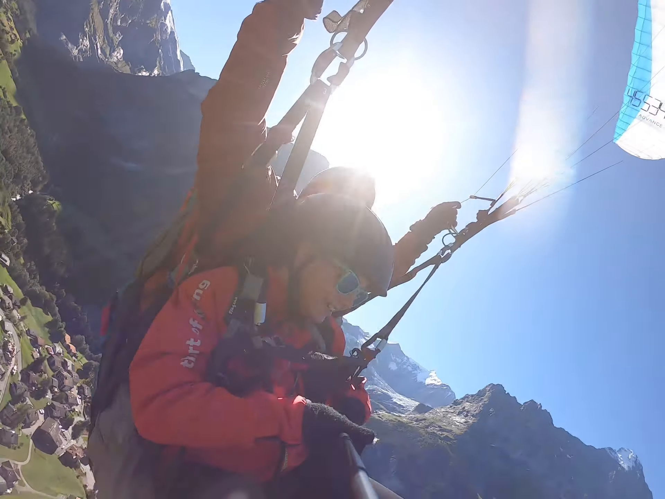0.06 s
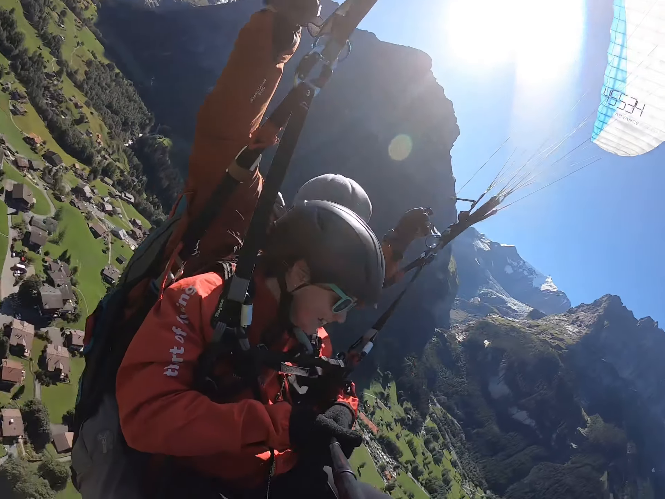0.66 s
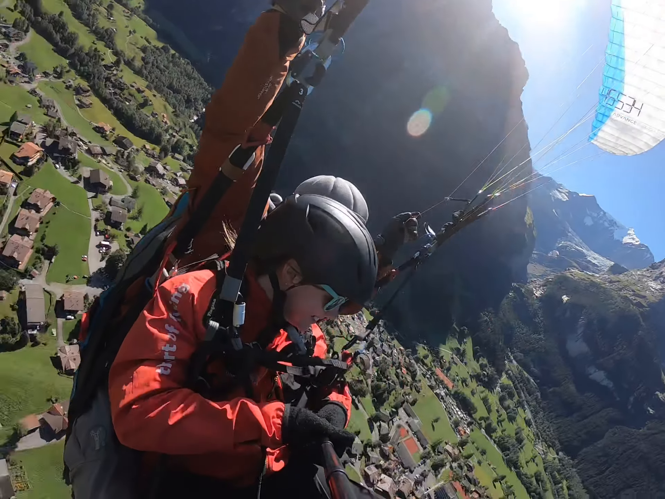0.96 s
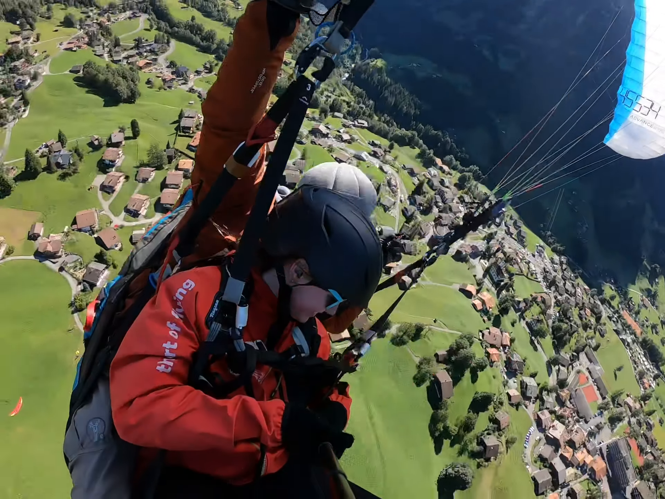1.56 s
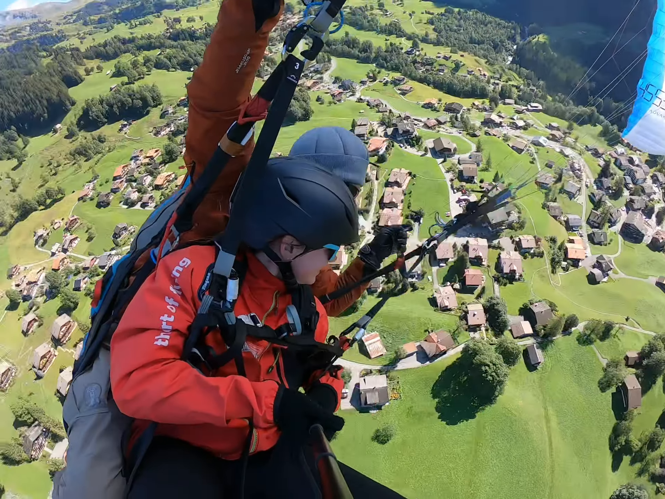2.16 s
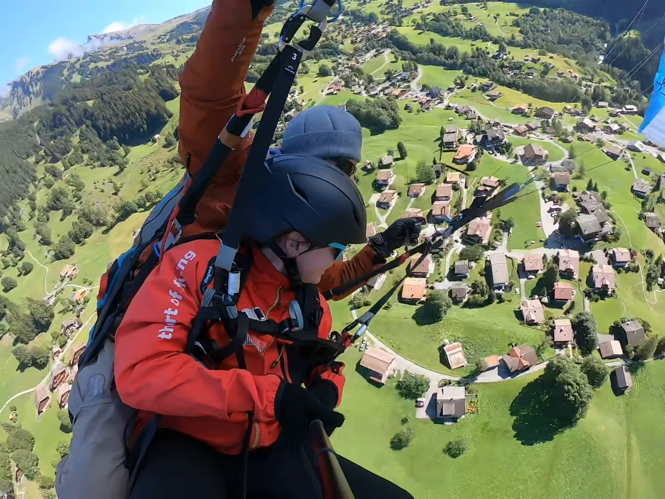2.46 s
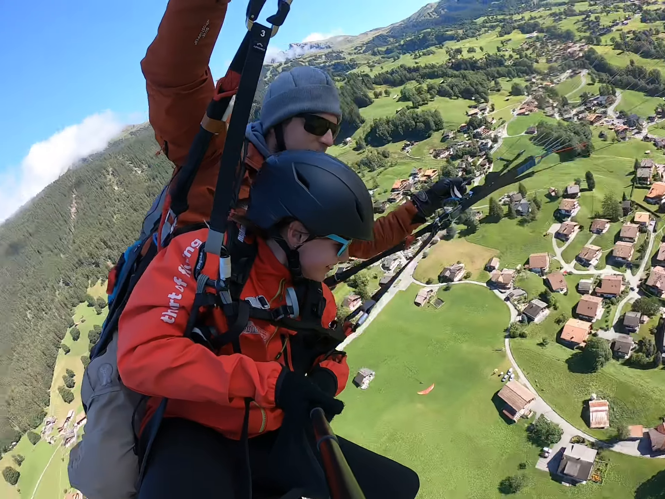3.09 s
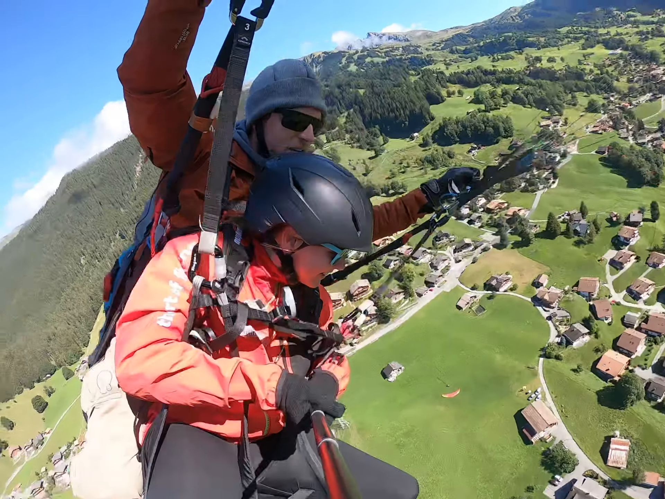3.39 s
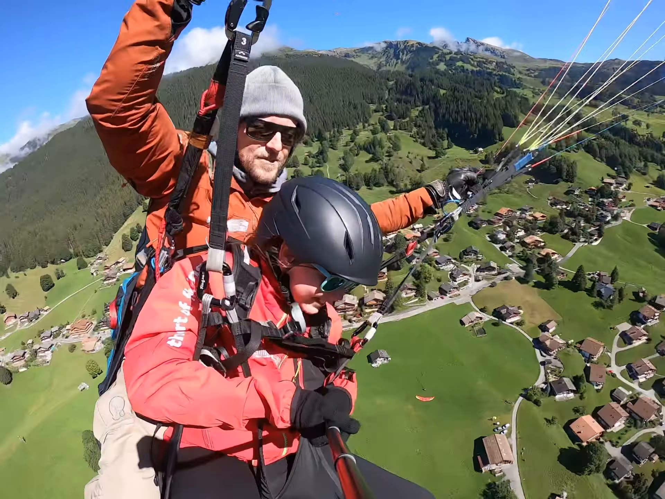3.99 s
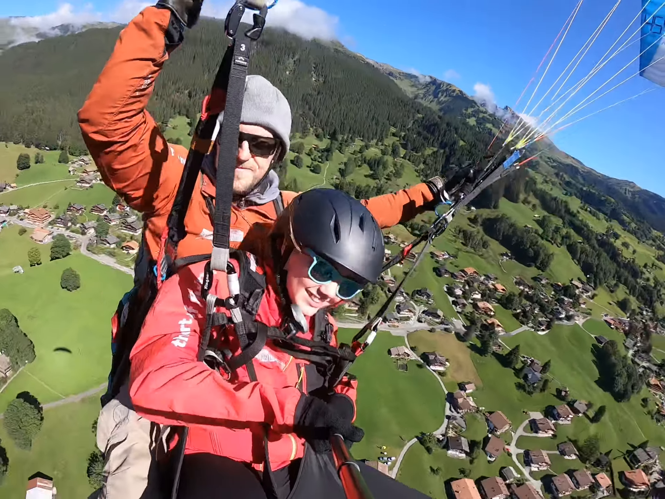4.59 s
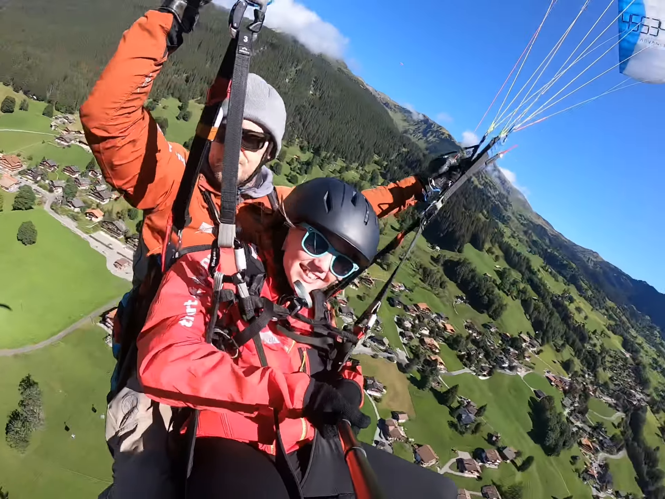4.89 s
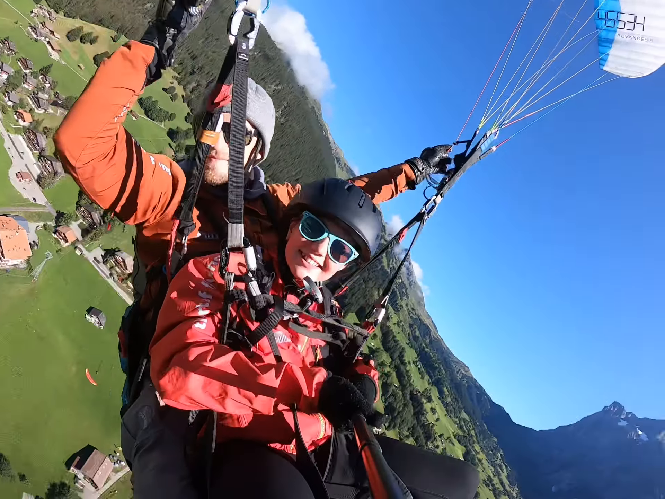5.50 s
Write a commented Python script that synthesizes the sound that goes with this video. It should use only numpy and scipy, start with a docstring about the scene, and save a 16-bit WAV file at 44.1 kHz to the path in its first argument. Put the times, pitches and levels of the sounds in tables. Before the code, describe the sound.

Strong wind rumbles and buffets the microphone on a paraglider, easing for a while and then building to a louder rush.

```python
"""Paraglider in a steep turn

A tandem paraglider swings through a turn, with a camera held out on a pole in the moving air.
The air slows and speeds up again: swirls of it buffet the microphone and drone behind the pole.
Harness and lines hiss, one thin line whistles briefly, cloth flaps and a strap creaks.
One gust hits the microphone with a sharp crack. The camera's limiter turns down the loudest peaks."""
import sys
import numpy as np
from scipy import signal
from scipy.fft import rfft, irfft, next_fast_len
from scipy.io import wavfile
from scipy.ndimage import uniform_filter1d, minimum_filter1d, map_coordinates

SR = 44100
rng = np.random.default_rng(int(sys.argv[2]) if len(sys.argv) > 2 else 0)


def file_out(sig):
    """Save sig as 16-bit WAV at sys.argv[1]."""
    # one column per channel
    cols = np.atleast_2d(sig).T
    # limit, then scale
    lim = np.clip(cols, -1, 1)
    pcm = np.round(lim * 32767).astype(np.int16)
    wavfile.write(sys.argv[1], SR, pcm)


N = 249165
TIME = np.arange(N) / SR  # seconds


def wind(speed):
    """The main sound: six layers of air noise, all growing louder as the air gets faster."""
    buffet_gust_db, roar_gust_db = gusts()
    lull_db = -14 * swell(2.78, length_s=.2)  # the buffeting thins out while flutter() plays
    buffet_db = wind_level(speed, cruise_db=-18.5, power=.84, fade_db_per_s=2) + buffet_gust_db + lull_db
    roar_db = wind_level(speed, cruise_db=-27.5, power=1.89, fade_db_per_s=7.5, surge_db=-10.5)
    roar_db += roar_gust_db
    drone_db = wind_level(speed, cruise_db=-25.5, power=2.15, fade_db_per_s=4.5, surge_db=7)
    rush_db = wind_level(speed, cruise_db=-40.5, power=1.82, fade_db_per_s=1.5, surge_db=1)
    hiss_db = wind_level(speed, cruise_db=-54, power=2.22, fade_db_per_s=4)
    pressure = buffet()
    swirls = wobble(60)  # the same swirls of air roughen several layers together
    return (amp(buffet_db) * pressure
            + amp(drone_db) * pole_drone(speed)
            + amp(roar_db) * roar(speed, swirls)
            + amp(rush_db) * rush(swirls)
            + amp(hiss_db) * harness_hiss(speed, swirls)
            + amp(roar_db - 16.5) * sputter(pressure, swirls))


def wind_level(speed, cruise_db, power, fade_db_per_s, surge_db=0):
    """A layer's level in dB. Air that speeds up feeds the drone; slowing air breaks it up into roar."""
    speed_db = 20 * np.log10(speed)
    speeding_up = uniform_filter1d(np.gradient(speed, TIME), size=SR // 2)  # cruising speeds per second
    sheltered_s = np.maximum(TIME - 4.205, 0)  # late in the turn the microphone swings out of the stream
    return cruise_db + power * speed_db - fade_db_per_s * sheltered_s + surge_db * speeding_up


# Gusts (+) and lulls (-): (middle time [s], length [s], buffet change [dB], roar change [dB])
GUSTS_AND_LULLS = [(0.16, 0.24, -3, 2), (0.37, 0.18, 2, 0.5), (.59, 0.028, -12, 0), (0.785, 0.51, 2, -1.5),
                   (1.314, 0.044, -4, 1), (1.596, 0.68, -1.9, 1.5), (1.894, 0.057, 2.5, 4),
                   (2.485, 0.44, -2.5, 1), (2.49, 0.042, -2.5, -5), (3.03, 0.59, 2.5, 1.5),
                   (3.48, 0.039, 0, -3.5), (3.65, 0.2, -0.5, 4.5), (3.788, 0.081, 0, 3.5),
                   (4.11, 0.037, 0, -4.5), (4.596, 0.11, -1, 5.5), (4.747, .06, 2, -1.5),
                   (5.042, 0.16, -4, 1), (5.146, 0.055, 1, 3.5), (5.515, 0.055, 3, -2)]

def gusts():
    """Gusts and lulls at the microphone push the buffet and the roar up or down, in dB."""
    buffet_db = sum(db * swell(s, length_s) for s, length_s, db, _ in GUSTS_AND_LULLS)
    roar_db = sum(db * swell(s, length_s) for s, length_s, _, db in GUSTS_AND_LULLS)
    return buffet_db, roar_db


# The deep rumble of air on the microphone: (frequency [Hz], level [dB])
BUFFET_SPECTRUM = [(8, -25), (22, -6), (42, -1), (65, -2), (110, -3), (150, -11.5), (220, -20.5),
                   (400, -34), (900, -97)]

def buffet():
    """Swirling air beats on the microphone with a deep, uneven rumble."""
    rumble = air(BUFFET_SPECTRUM, stretch=.98, size=8192)
    return steady(rumble * amp(.49 * wobble(35)))


# The drone behind the pole at cruising speed: (frequency [Hz], level [dB])
DRONE_SPECTRUM = [(70, -24), (140, -3.5), (185, -3.5), (202, 1.5), (222, -6), (270, -12.5), (500, -40),
                  (1200, -91)]

def pole_drone(speed):
    """Whirls of air peel off the pole and hum; faster air makes the hum higher."""
    return air(DRONE_SPECTRUM, stretch=speed, size=4096)


# The low roar of churning air: (frequency [Hz], level [dB])
ROAR_SPECTRUM = [(60, -12), (160, -0.5), (250, 1.5), (340, -4), (450, -8.5), (560, -16), (1200, -45),
                 (3000, -74.5)]

def roar(speed, swirls):
    """Churning air roars, a little higher when it is fast, and each swirl shakes its level."""
    noise = air(ROAR_SPECTRUM, stretch=.99 * speed ** .17)
    return steady(noise * amp(1.38 * swirls + .19 * wobble(28)))


# The broad rush of passing air: (frequency [Hz], level [dB])
RUSH_SPECTRUM = [(120, -20.5), (400, -4.5), (700, 0), (1000, -3), (1400, -5), (2000, -6.5), (2700, -9.5),
                 (3400, -10.5), (3750, -11.5), (4200, -16), (6000, -39), (10000, -78.5)]

def rush(swirls):
    """Air streams past with a brighter noise, lightly roughened by the swirls."""
    noise = air(RUSH_SPECTRUM, stretch=.9)  # a tenth lower than the table
    return steady(noise * amp(.5 * swirls + .18 * wobble(22)))


# The high hiss of harness and lines: (frequency [Hz], level [dB])
HISS_SPECTRUM = [(1500, -23.5), (3500, 4.5), (4500, 1), (5600, 1), (7000, -2.5), (8300, -7), (9600, -11.5),
                 (10500, -17.5), (11500, -25), (14000, -29.5)]

def harness_hiss(speed, swirls):
    """Air hisses over the harness and lines, a little brighter when it is fast."""
    noise = air(HISS_SPECTRUM, stretch=speed ** .2)
    return steady(noise * amp(.22 * swirls))


def sputter(pressure, swirls):
    """When the pressure peaks, the air tears away from the microphone's opening in short sputters."""
    tearing = amp(1.4 * swirls + 1.8 * pressure + 1.6 * wobble(160))
    return steady(band(centre_hz=626, octaves=.78) * tearing)


# Strong swirls hitting the microphone: (time [s], level [dB], centre frequency [Hz])
SWIRL_HITS = [(.085, -22, 310), (.27, -24.5, 340), (.464, -23.5, 330), (0.848, -23, 310),
              (.885, -24.5, 330), (1.458, -28, 328), (1.611, -27, 285), (1.873, -26.5, 270),
              (3.396, -30, 340), (3.668, -26.5, 450), (3.791, -21, 288), (3.868, -23.5, 330),
              (4.243, -28, 358), (4.345, -22.5, 360), (4.431, -23, 290), (4.769, -27, 450),
              (5.144, -26.5, 310)]

def thumps():
    """Each strong swirl bursts on the microphone with a short, low thump."""
    return sum(amp(db) * puff(s, hz, octaves=.5, rise_s=.007, decay_s=.008) for s, db, hz in SWIRL_HITS)


# A row of separate whirls of air: (time [s], level [dB])
PASSING_WHIRLS = [(2.641, -9), (2.683, -10.5), (2.724, -10.5), (2.756, -8.5), (2.791, -10.5), (2.831, -8.5),
                  (2.851, -12), (2.882, -10.5)]

def flutter():
    """Each passing whirl pushes on the microphone and then pulls, so the wind stutters."""
    out = np.zeros(N)
    for s, db in PASSING_WHIRLS:
        hz = 77.6 * np.exp(.15 * rng.standard_normal())
        push_pull = -np.sin(2 * np.pi * hz * (TIME - s))
        out += amp(db) * swell(s, length_s=.011) * push_pull
    return out


# Cloth flaps and, in the last row, the crack of a gust hitting the microphone:
# (time [s], level [dB], centre frequency [Hz], width [octaves])
FLAPS_AND_GUST_CRACK = [(.353, -37.5, 1100, .6), (.560, -35.5, 1100, .65), (.715, -37, 1450, .5),
                        (0.891, -32.5, 1530, 0.61), (1.335, -43, 1400, .6), (1.367, -38, 1250, 0.63),
                        (2.135, -46, 1300, 0.72), (2.154, -39.5, 1350, 0.49), (2.660, -41, 1150, 0.85),
                        (2.825, -41, 1100, 0.87), (3.225, -36, 850, 0.45), (3.309, -37, 1600, 0.84),
                        (3.554, -36, 1400, 0.55), (3.728, -35.5, 1156, 0.5), (3.871, -36, 1450, 0.6),
                        (4.346, -28.5, 600, 0.53)]

def flaps_and_gust_crack():
    """Cloth flaps in quick, dull puffs; one gust cracks on the microphone, on top of its low thump."""
    puffs = sum(amp(db) * puff(s, hz, octaves, rise_s=.0035, decay_s=.0055)
                for s, db, hz, octaves in FLAPS_AND_GUST_CRACK)
    return cut_treble(puffs, above_hz=3400, steepness=12)


# Creaks of a strap: (time [s], level [dB], pitch [Hz])
STRAP_SLIPS = [(4.877, -39, 1270), (5.226, -40, 1176), (5.383, -38.5, 1333)]

def strap_creaks():
    """A tight strap slips in its buckle with a short, rough chirp."""
    out = np.zeros(N)
    for s, db, hz in STRAP_SLIPS:
        out += amp(db) * swell(s, length_s=.016) * rough_tone(hz, roughness=.09, rate=900)
    return out


# Moments when air catches a fold of the harness: (middle time [s], length [s], level [dB])
FOLD_CATCHES = [(.6, 1, -50), (2.988, 0.93, -50.5), (4.813, 0.51, -48.5), (5.33, 0.6, -46.5)]
# The fold's hollow sound if it were tuned to 1000 Hz: (frequency [Hz], level [dB])
FOLD_SPECTRUM = [(600, -60.5), (850, -2), (980, -1.5), (1120, -8), (1350, -7), (2200, -61.5)]

def harness_fold(speed):
    """Air in a fold colours the rush, but its ringing dies too fast to become a note."""
    level = sum(amp(db) * swell(s, length_s) for s, length_s, db in FOLD_CATCHES)
    hz = 1450 * speed ** .28  # rises a little with the airspeed
    return level * air(FOLD_SPECTRUM, stretch=hz / 1000)


# Sleeve strokes: (middle time [s], length [s], level [dB], centre frequency [Hz], width [octaves])
SLEEVE_BRUSHES = [(3.28, .09, -57.5, 4760, .3), (3.38, 0.25, -72.5, 7500, .35)]

def sleeve():
    """A sleeve brushes the harness, then rustles on more faintly."""
    return sum(amp(db) * swell(s, length_s) * band(hz, octaves)
               for s, length_s, db, hz, octaves in SLEEVE_BRUSHES)


# Moments when a thin line sings: (middle time [s], length [s], level [dB])
LINE_WHISTLES = [(3.92, .17, -70), (4.28, .17, -68), (4.5, .13, -71)]

def line_whistle():
    """Tiny whirls behind a thin line make a faint, fuzzy tone that rises as the glider gathers speed."""
    hz = 8190 + 650 * (TIME - 4.2)  # climbs 650 Hz each second
    tone = rough_tone(hz, roughness=.0108, rate=700)
    level = sum(amp(db) * swell(s, length_s) for s, length_s, db in LINE_WHISTLES)
    return level * amp(2 * wobble(37)) * tone


def amp(db):
    """Turn decibels into a number to multiply a sound by."""
    return 10 ** (np.asarray(db) / 20)


def unit(x):
    """Scale x to an average strength (rms) of 1."""
    return x / np.sqrt(np.mean(x ** 2) + 1e-20)


def steady(x, size=7000):
    """Even out the slow swells in x, keeping its strength near 1."""
    power = uniform_filter1d(uniform_filter1d(x ** 2, size), size // 2)
    return x / np.sqrt(np.abs(power) + 1e-20)


def swell(middle_s, length_s):
    """A smooth rise from 0 to 1 and back, length_s wide at half height."""
    return .5 ** ((2 * (TIME - middle_s) / length_s) ** 2)


def wobble(rate):
    """A smooth curve through random points, rate of them each second."""
    points = rng.standard_normal(N // 8)
    return unit(map_coordinates(points, [TIME * rate], mode="mirror"))


def rough_tone(hz, roughness, rate):
    """A tone whose pitch trembles at random; roughness is the tremble as a share of the pitch."""
    pitch = hz * (1 + roughness * wobble(rate))
    return unit(np.sin(2 * np.pi * np.cumsum(pitch) / SR))


def filtered(x, response):
    """Turn each frequency in x up or down by response(hz)."""
    size = next_fast_len(len(x) + SR // 2)
    hz = np.fft.rfftfreq(size, 1 / SR)
    return irfft(rfft(x, size) * response(hz), size)[:len(x)]


def cut_treble(x, above_hz, steepness):
    """Fade out the frequencies higher than above_hz."""
    return filtered(x, lambda hz: 1 / np.sqrt(1 + (hz / above_hz) ** steepness))


def air(spectrum, stretch, size=2048):
    """Steady noise shaped by a spectrum table, with the table's frequencies multiplied by stretch."""
    hz, times, slices = signal.stft(rng.standard_normal(N), SR, nperseg=size)
    factor = np.interp(times, TIME, stretch * np.ones(N))
    table_hz, table_db = np.transpose(spectrum)
    shape_db = np.interp(np.log(hz[:, None] / factor + 1), np.log(table_hz + 1), table_db)
    _, noise = signal.istft(slices * amp(shape_db), nperseg=size)
    return steady(noise[:N])


def band(centre_hz, octaves, size=N):
    """Noise of strength 1 in one soft-edged band of frequencies."""
    bell = lambda hz: np.exp(-.5 * (np.log2((hz + 1) / centre_hz) / octaves) ** 2)
    return unit(filtered(rng.standard_normal(size), bell))


def puff(s, centre_hz, octaves, rise_s, decay_s):
    """A quick burst of noise that reaches strength 1 at time s, then dies away."""
    t = np.arange(-2000, 3200) / SR
    shape = np.exp(np.minimum(t / rise_s, -t / decay_s))
    burst = unit(shape * band(centre_hz, octaves, size=len(t))) * np.sqrt(np.mean(shape ** 2))
    out = np.zeros(N + SR)
    start = round((s + t[0]) * SR)
    out[start:start + len(t)] = burst
    return out[:N]


# How fast the air passes during the turn: (time [s], airspeed [times cruising speed])
TURN_AIRSPEED = [(0, .99), (.65, .96), (1.1, .79), (1.55, .7), (2.1, .655), (2.5, .675), (2.75, .75),
                 (3.15, .8), (3.5, .94), (4.1, 1.03), (4.55, 1.16), (5.65, 1.23)]

def scene():
    """One airspeed drives the wind; everything reaches one microphone in open air, with no echo."""
    times, speeds = np.transpose(TURN_AIRSPEED)
    speed = np.interp(TIME, times, speeds)
    airflow = wind(speed) + thumps() + flutter()
    details = flaps_and_gust_crack() + strap_creaks() + harness_fold(speed) + sleeve() + line_whistle()
    return (airflow + details)[None]


def record(dry):
    """The camera's limiter turns down the highest peaks, and its treble ends steeply."""
    ceiling, window_samples = amp(-7.6), 400
    needed_gain = np.minimum(1, ceiling / (np.abs(dry[0]) + 1e-9))
    held_gain = minimum_filter1d(needed_gain, window_samples)
    smooth_gain = uniform_filter1d(held_gain, window_samples)
    return cut_treble(dry[0] * smooth_gain, above_hz=11030, steepness=18)[None]


dry = scene()
out = record(dry)
file_out(out)
```